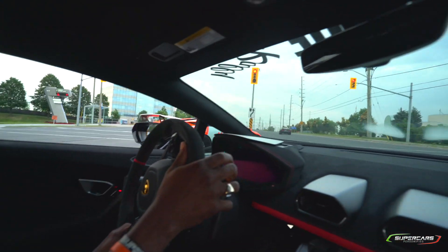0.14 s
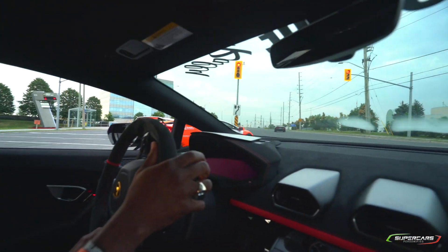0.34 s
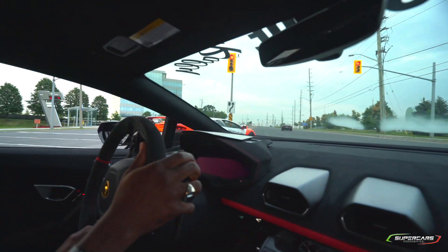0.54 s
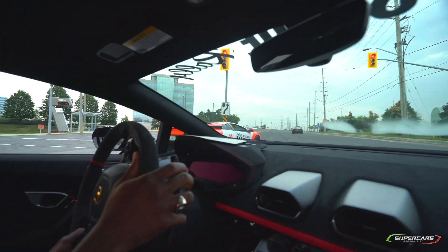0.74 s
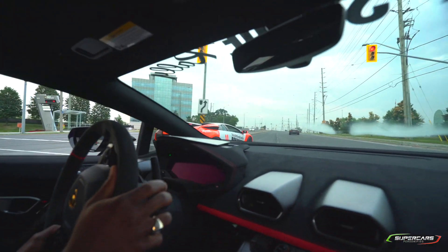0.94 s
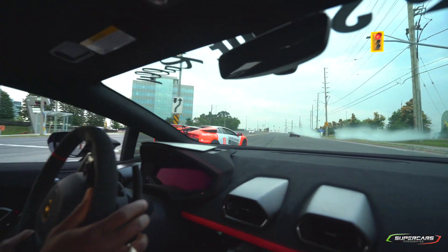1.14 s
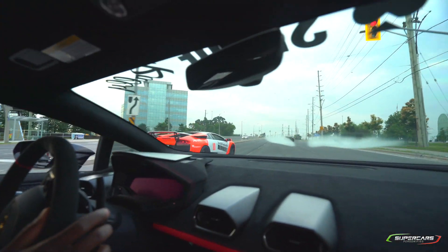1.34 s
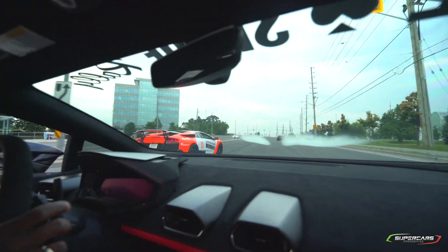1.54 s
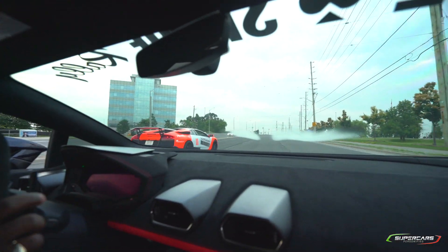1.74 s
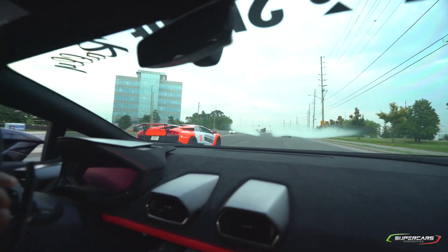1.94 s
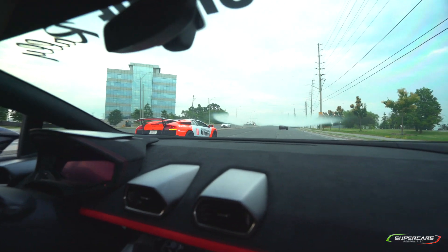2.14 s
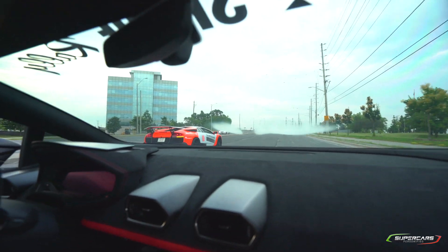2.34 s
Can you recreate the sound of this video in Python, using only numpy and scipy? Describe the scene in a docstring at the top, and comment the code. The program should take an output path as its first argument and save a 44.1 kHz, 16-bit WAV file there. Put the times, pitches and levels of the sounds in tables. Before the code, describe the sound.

From inside a car pulling away, an overtaking sports car's engine grows loud and rises in pitch with a light hiss. As it recedes, the nearer engine booms and jumps in revs while bumps thud under the wheels.

```python
"""Inside the cabin of a ten-cylinder sports car pulling away, while an eight-cylinder sports car overtakes at
full throttle. The other car's even firings sweep past as clean gliding exhaust tones, with hiss, raspy swells
and a gas roar that rings the cabin. Our own engine hums on the multiples of its cycle, booms in the cabin, then
jumps in revs. Underneath, the body drones, the road rumbles and bumps thump under the wheels."""
import sys
import numpy as np
from scipy import signal
from scipy.fft import rfft, irfft
from scipy.io import wavfile
from scipy.ndimage import map_coordinates

SR = 44100
rng = np.random.default_rng(int(sys.argv[2]) if len(sys.argv) > 2 else 0)


def waveform_to_disk(signal):
    """Save audio, clipped to [-1, 1], as 16-bit WAV at the path in sys.argv[1]."""
    frames = np.transpose(np.atleast_2d(signal))
    scaled = np.clip(frames, -1, 1) * 32767
    samples = np.round(scaled).astype(np.int16)
    wavfile.write(sys.argv[1], SR, samples)


N = 110250
TIME = np.arange(N) / SR


def undb(db):
    return 10 ** (np.asarray(db) / 20)


def curves(table):
    """Each column after the time column, drawn as a sample-by-sample curve."""
    rows = np.array(table, float)
    return [np.interp(TIME, rows[:, 0], column) for column in rows.T[1:]]


def colour_db(table, hz):
    """Gain of an EQ curve at hz, on a log frequency axis."""
    rows = np.array(table, float)
    return np.interp(np.log(hz), np.log(rows[:, 0]), rows[:, 1])


def wander(rate_hz):
    """Smooth random movement with a spread of about 1."""
    steps = np.arange(0, N + 64, 64)
    path = map_coordinates(rng.standard_normal(200), [steps * rate_hz / SR], order=3)
    return np.interp(np.arange(N), steps, path)


def noise(colour, flicker_db, flicker_hz):
    """Coloured noise whose half-octave bands each flicker on their own; rms 1."""
    hz = np.arange(1, N // 2 + 2) * SR / N
    low, high = colour[0][0], colour[-1][0]
    spectrum = rfft(rng.standard_normal(N)) * undb(colour_db(colour, hz)) * (hz > low) * (hz < high)
    out = 0
    for band in np.arange(np.floor(2 * np.log2(low)), 2 * np.log2(high) + 1):
        share = np.clip(1 - np.abs(2 * np.log2(hz) - band), 0, 1)
        out += irfft(spectrum * share, N) * undb(flicker_db * wander(flicker_hz))
    return out / np.std(out)


def tone(turns, db):
    """A pure tone at rms level db, on a running phase in turns."""
    return np.sqrt(2) * undb(db) * np.cos(2 * np.pi * turns)


def ring(hz, width_hz):
    """Noise through one resonance; rms 1."""
    detune = 2 * (np.arange(N // 2 + 1) * SR / N - hz) / width_hz
    out = irfft(rfft(rng.standard_normal(N)) / (1 + detune ** 2), N)
    return out / np.std(out)


def other_exhaust():
    """The overtaking car: even firings make strong low tones, with overtones and gas roar on top."""
    # Each row: time in seconds, firing rate in Hz, levels in dB at 1, 2 and 1.5 times that rate.
    note = [(0, 293.6, -27.5, -29, -36), (0.15, 296, -24, -26.5, -28.5), (0.24, 302.6, -26, -29, -34),
            (0.47, 301.5, -19.5, -30, -30), (0.53, 304.5, -14.5, -20.5, -27),
            (0.58, 308.8, -11, -14, -23.5), (0.66, 311.5, -13.5, -14.0, -30),
            (0.78, 313.5, -12.5, -14.5, -34), (0.9, 319.9, -11.5, -15.5, -37.5),
            (1.07, 330, -9.5, -20, -38), (1.17, 330.7, -9.5, -21, -43), (1.3, 342.2, -10, -29, -52),
            (1.4, 337.4, -11.5, -36, -47), (1.5, 345.2, -11.5, -26.5, -50), (1.63, 359.7, -14, -29, -65),
            (1.72, 359.3, -12.5, -31.5, -49), (1.8, 360.8, -13.5, -29, -51.5),
            (1.9, 370, -15, -37.5, -44.5), (2.02, 374.1, -15.5, -37, -41), (2.14, 384.5, -22, -38, -50),
            (2.26, 389.1, -23, -37.5, -41), (2.36, 404.5, -21.5, -38.0, -43.5), (2.5, 409, -26, -39, -31.5)]
    # Each row: time in seconds, then gains in dB for the overtones, the gas roar and the cabin ringing.
    upper_mix = [(0, -60, -36.5, -45), (.22, -55.5, -36, -45.5), (.3, -56, -38, -59), (.5, -55, -41, -41.5),
                 (.56, -43.5, -36, -51.5), (.84, -43, -34.5, -52.5), (.92, -42.5, -34.5, -48),
                 (1.03, -44.5, -39.5, -49.5), (1.09, -48, -44, -46.5), (1.4, -57.5, -45.5, -44.5),
                 (1.75, -56, -40, -47), (2.0, -57, -43, -43.5), (2.26, -57, -41, -42.5),
                 (2.36, -50, -39, -36), (2.5, -43, -37, -41)]
    hz, first_db, second_db, between_db = curves(note)
    overtone_db, roar_db, ring_db = curves(upper_mix)
    firings = np.cumsum(hz * (1 + .0008 * wander(25))) / SR  # the pitch wavers slightly
    partials = [(1, first_db), (2, second_db), (1.5, between_db), (2.5, between_db - 11)]
    low_tones = sum(tone(k * firings, db + k * .52 * wander(16)) for k, db in partials)
    return low_tones + exhaust_overtones(hz, firings, overtone_db) + gas_roar(firings, roar_db, ring_db)


def exhaust_overtones(firing_hz, firings, gain_db):
    """Tones at 3 to 15 times the firing rate, in half multiples, combed by a short inverted echo."""
    # Each row: time in seconds, echo share from 0 to 1, half-multiple gain in dB, tilt in dB per octave.
    shape = [(0, 0.47, 2.5, -6), (.8, 0.67, -1.5, -1.5), (.88, 0.16, -11.5, 1.5), (1.02, .2, -6, 1.5),
             (1.08, 0.3, -5, -11), (2.5, 0.3, -7.5, -11)]
    # Each row: frequency in Hz, gain in dB.
    colour = [(950, -4), (1250, -6), (1800, 1), (2350, -2), (2800, -9), (3300, -15), (4050, -13),
              (4800, -22)]
    echo_s, waver_db = .00195, 1.8
    echo, half_db, tilt_db = curves(shape)
    out = 0
    for halves in range(6, 31):
        multiple = halves / 2
        hz = multiple * firing_hz
        comb = np.abs(1 - echo * np.exp(2j * np.pi * hz * echo_s))
        db = gain_db + colour_db(colour, hz) + half_db * (halves % 2) + tilt_db * np.log2(hz / 1800)
        db += waver_db * wander(1.1 * multiple)  # higher tones waver faster
        out += comb * tone(multiple * firings + rng.random(), db)
    return out


def gas_roar(firings, roar_db, ring_db):
    """Exhaust gas puffs with each firing and rings narrow cabin resonances, each with its own flutter."""
    # Each row: frequency in Hz, noise density in dB.
    colour = [(470, -31), (800, 3), (1410, 0), (1510, 4.5), (2100, 1), (2290, 0.5), (2530, -6), (3520, -6),
              (5060, -17.5), (6580, -40)]
    # Each row: centre in Hz, width in Hz, relative level in dB.
    resonances = [(1141, 120, 2.5), (1540, 90, 2.5), (1888, 56, -5.5), (2352, 90, -2), (2816, 240, -5),
                  (3346, 180, -6.5)]
    puff = 1 + .1 * np.cos(2 * np.pi * firings)
    flutter = undb(.49 * wander(30))
    roar = puff * noise(colour, flicker_db=1.2, flicker_hz=12)
    ringing = sum(undb(db + 2 * wander(25.18)) * ring(hz, width) / 2 for hz, width, db in resonances)
    return flutter * (undb(roar_db) * roar + undb(ring_db) * ringing)


def hiss():
    """The other car's treble hiss, dotted with small ticks: bright when close, duller when faint."""
    # Each row: time in seconds, level in dB.
    level = [(0, -60), (.05, -53), (.22, -57.5), (.27, -62.5), (.53, -63.5), (.62, -56.5), (.9, -54.5),
             (1.07, -63), (1.4, -66.5), (1.8, -62.5), (1.97, -65.5), (2.08, -62.5), (2.25, -65.5),
             (2.5, -61.5)]
    # Each row: frequency in Hz, noise density in dB.
    colour = [(5500, -8), (8800, -2.5), (10500, -4.5), (13000, -7), (15700, -13)]
    # The clear ticks among the random ones. Each row: start in seconds, strength from 0 to 3.
    clear_ticks = [(.682, 2), (.72, 2.5), (.795, 1.5), (.831, 2.6), (.868, 3)]
    ticks_per_s, tick_decay_s, tick_lift_db = 17, .005, 2.5  # the lift is per unit of strength
    dull_db_per_octave, fully_bright_db = -9, -57
    db = curves(level)[0]
    hits = (rng.random(N) < ticks_per_s / SR) * rng.exponential(size=N)
    for start, strength in clear_ticks:
        hits[int(start * SR)] = strength
    ticks = np.convolve(hits, np.exp(-TIME[:800] / tick_decay_s))[:N]
    dull_colour = [(hz, gain + dull_db_per_octave * np.log2(hz / 7000)) for hz, gain in colour]
    brightness = np.clip(undb(db - fully_bright_db) ** 2, 0, 1)
    bright = brightness * noise(colour, flicker_db=2.2, flicker_hz=30)
    dull = np.sqrt(1 - brightness ** 2) * noise(dull_colour, flicker_db=1.2, flicker_hz=3.6)
    return undb(db + 1.2 * wander(17) + tick_lift_db * ticks) * (bright + dull)


def own_engine():
    """Each bank fires five times a cycle: that tone booms, the cycle's other multiples hum unevenly."""
    # Each row: time in seconds, one bank's firing rate in Hz, boom level in dB, hum gain in dB.
    revs = [(0, 128.3, -31.5, -37.5), (.5, 129.9, -31.5, -43.5), (1.05, 135.5, -35, -43),
            (1.3, 140.8, -26.5, -40.5), (1.62, 144.4, -19, -40), (1.8, 146.7, -16.5, -41),
            (2.0, 147.4, -18.5, -40.5), (2.025, 149.1, -28.5, -51), (2.055, 151.5, -15, -48),
            (2.1, 170.7, -40, -40.5), (2.13, 173.7, -15, -45), (2.19, 171.1, -27.5, -45),
            (2.5, 166, -31.5, -42)]
    # The hum's EQ. Each row: frequency in Hz, gain in dB.
    colour = [(25, -21), (55, -16.5), (200, 3.5), (400, 3.5), (520, -7), (900, -20)]
    scatter_db, waver_db = 1.5, 4
    bank_hz, boom_db, hum_db = curves(revs)
    cycles = np.cumsum(bank_hz) / SR / 5
    out = tone(5 * cycles, boom_db + .8 * wander(15))
    for k in range(1, 36):
        db = hum_db + colour_db(colour, k * bank_hz / 5) + scatter_db * rng.standard_normal()
        if k != 5:
            out += tone(k * cycles + rng.random(), db + waver_db * wander(14))
    return out


def road():
    """Rolling on the road: the body drones over a low, restless rumble."""
    # Each row: time in seconds, level in dB.
    drone_level = [(0, -26.5), (.25, -26.5), (.5, -26), (1, -31), (1.5, -35), (2, -33), (2.2, -31.5),
                   (2.5, -34.5)]
    rumble_level = [(0, -27), (.3, -29.5), (.55, -29), (1.06, -36.5), (1.15, -29), (2, -27), (2.5, -24)]
    # Each row: frequency in Hz, noise density in dB.
    drone_colour = [(70, -27.5), (100, -2), (180, 2), (340, 5), (520, -9), (620, 0), (770, 0), (860, -41.5)]
    rumble_colour = [(20, -28.5), (30, -14), (45, 1), (65, -5.5), (100, 0), (130, -9.5)]
    drone = undb(curves(drone_level)[0]) * noise(drone_colour, flicker_db=.57, flicker_hz=22)
    rumble = undb(curves(rumble_level)[0]) * noise(rumble_colour, flicker_db=2.8, flicker_hz=7.1)
    return drone + rumble


def thumps():
    """Each bump under the wheels rings the body with a short, deep note."""
    # Each row: start in seconds, gain in dB, body pitch in Hz.
    bumps = [(1.14, -23, 70.1), (1.21, -17, 52.2), (1.39, -17.5, 59.5), (1.51, -24, 52.1),
             (1.659, -15.5, 58.5), (2.08, -14, 62.16), (2.239, -11, 63)]
    attack_s, decay_s = .011, .03
    out = 0
    for start, db, hz in bumps:
        age = np.maximum(TIME - start, 0)
        envelope = 2 * (1 - np.exp(-age / attack_s)) * np.exp(-age / decay_s)
        out += undb(db) * envelope * np.sin(2 * np.pi * hz * age)
    return out


def rasps():
    """Narrow raspy bands from the other car swell and fade."""
    # Each row: middle in seconds, half length in seconds, pitch in Hz, level at the crest in dB.
    swells = [(1.6, 0.089, 2360, -41), (2.1, 0.043, 2960, -39), (2.46, 0.069, 2950, -40),
              (2.48, 0.044, 3000, -42), (2.42, .1, 3370, -46.5)]
    return sum(undb(db) * np.exp(-((TIME - middle) / half_length) ** 2) * ring(hz, width_hz=80)
               for middle, half_length, hz, db in swells)


def scene():
    """The overtaking car, our own engine and the road, mixed to mono."""
    other_car = other_exhaust() + rasps() + hiss()
    return (other_car + own_engine() + road() + thumps())[None]


def record(dry):
    """A short fade at the end, then a steep cut of the top treble."""
    fade_s, top_hz = .0044, 15700
    fade = np.clip((N / SR - TIME) / fade_s, 0, 1)
    return signal.sosfilt(signal.ellip(10, .2, 80, top_hz, fs=SR, output="sos"), dry * fade)


dry = scene()
out = record(dry)
waveform_to_disk(out)
```